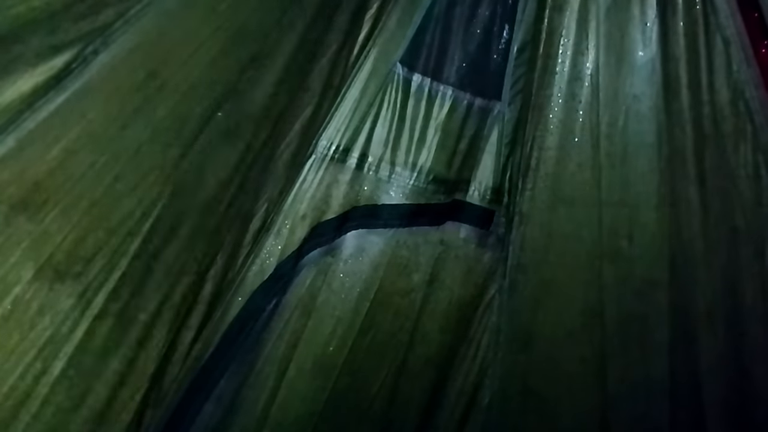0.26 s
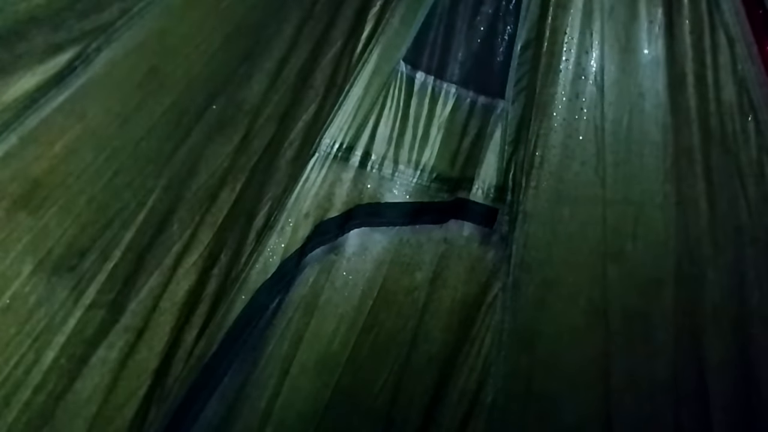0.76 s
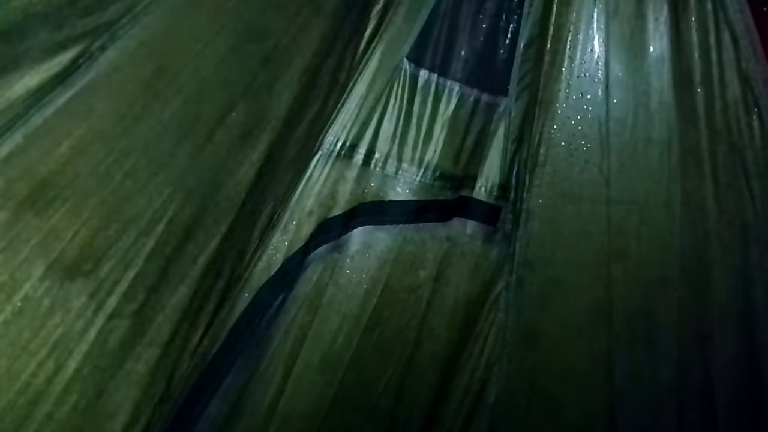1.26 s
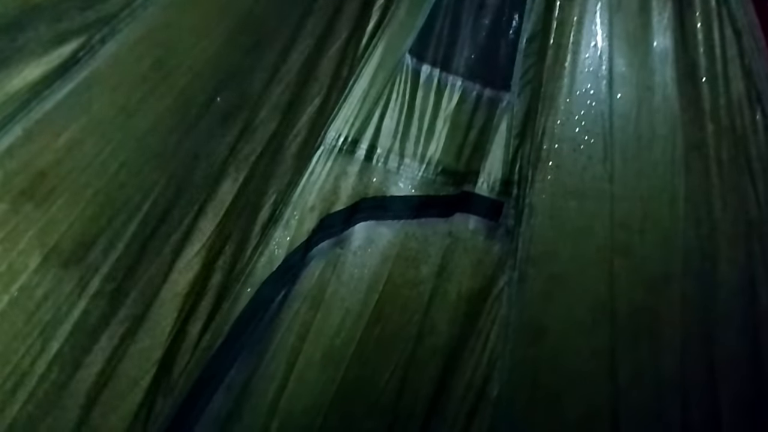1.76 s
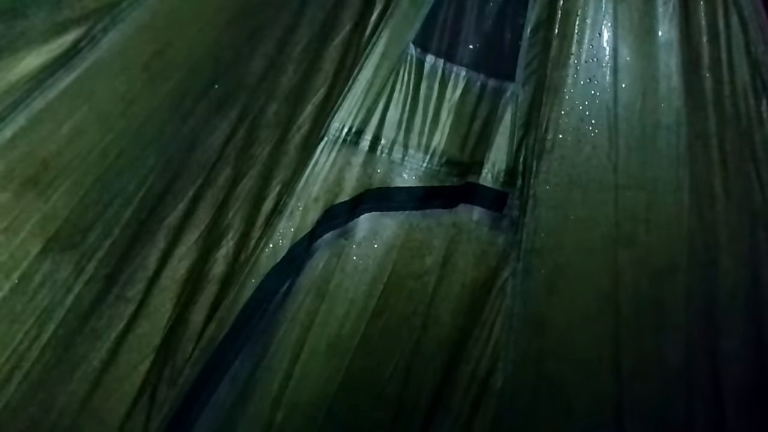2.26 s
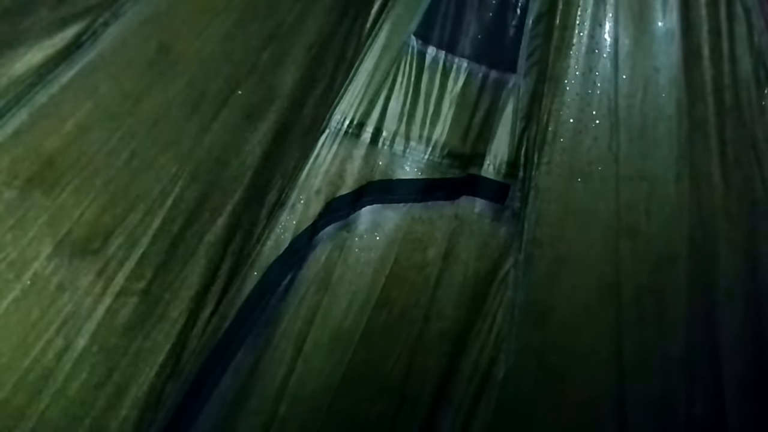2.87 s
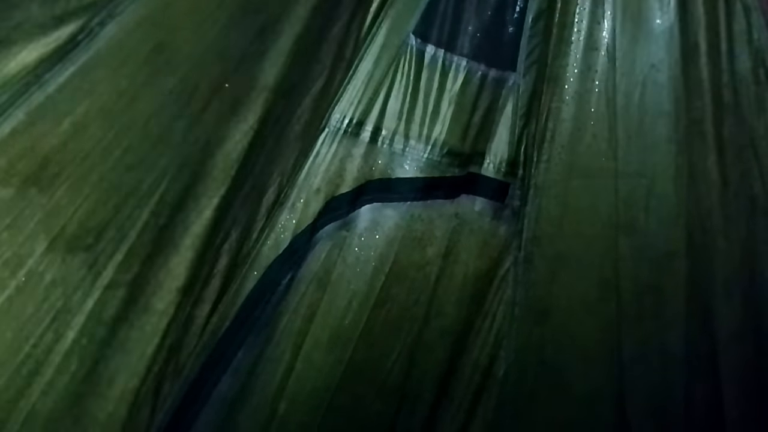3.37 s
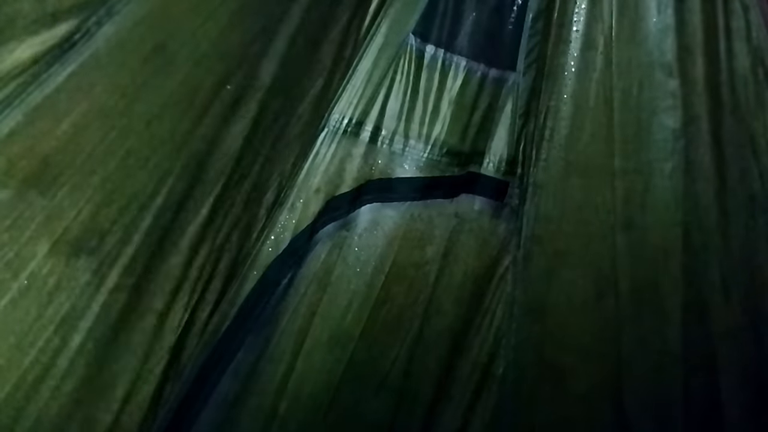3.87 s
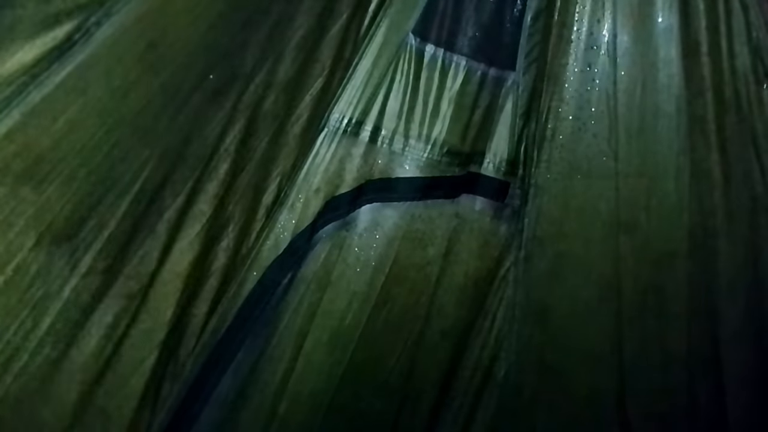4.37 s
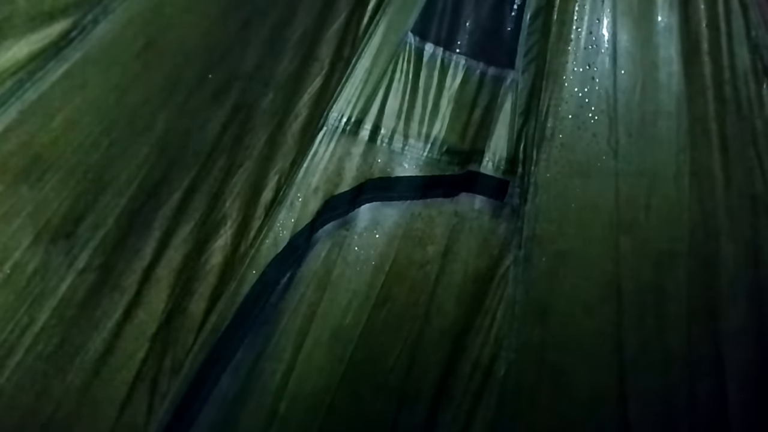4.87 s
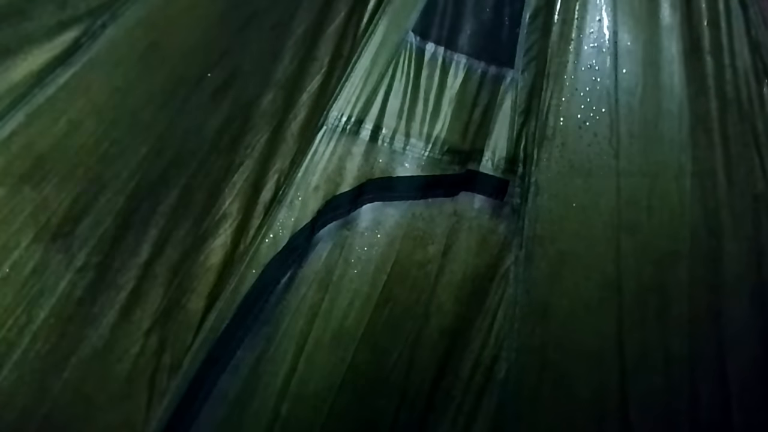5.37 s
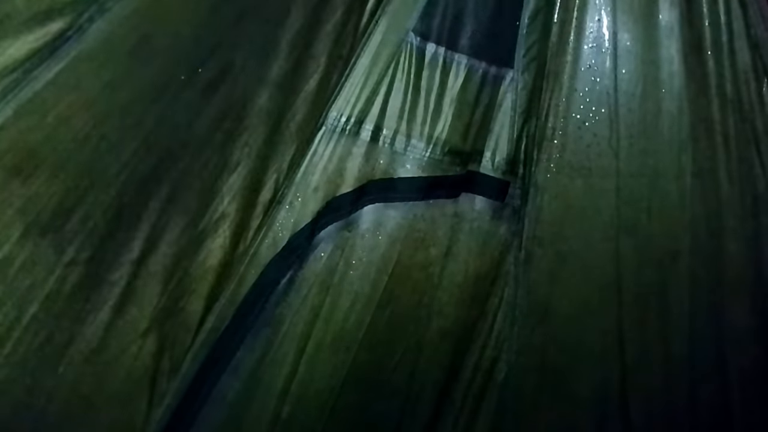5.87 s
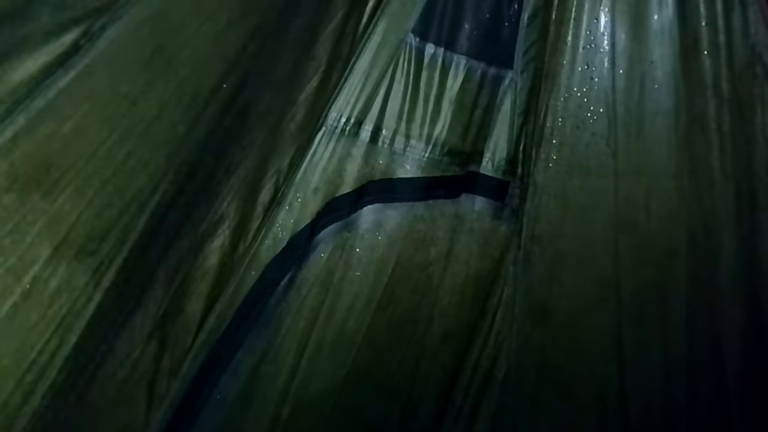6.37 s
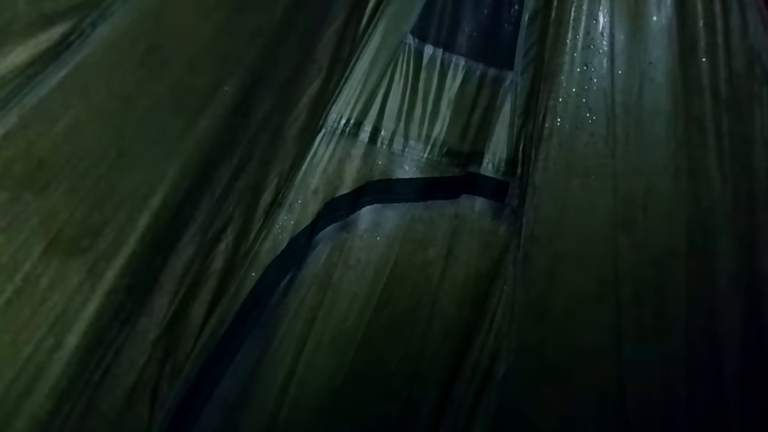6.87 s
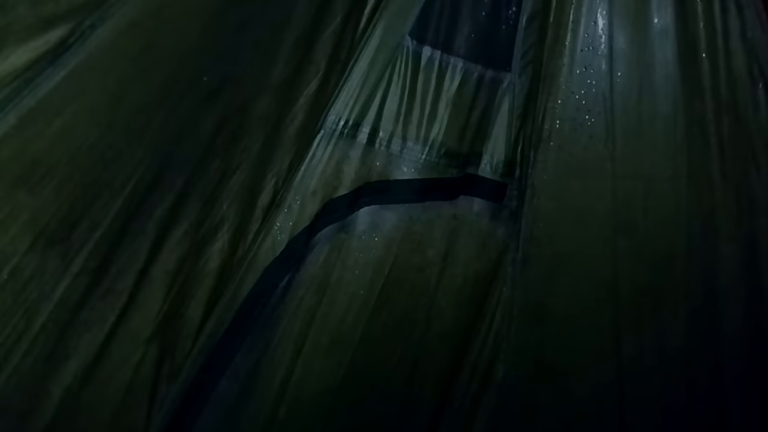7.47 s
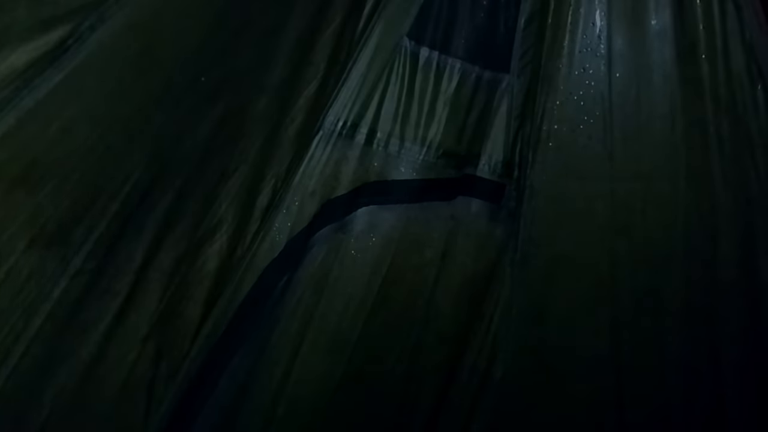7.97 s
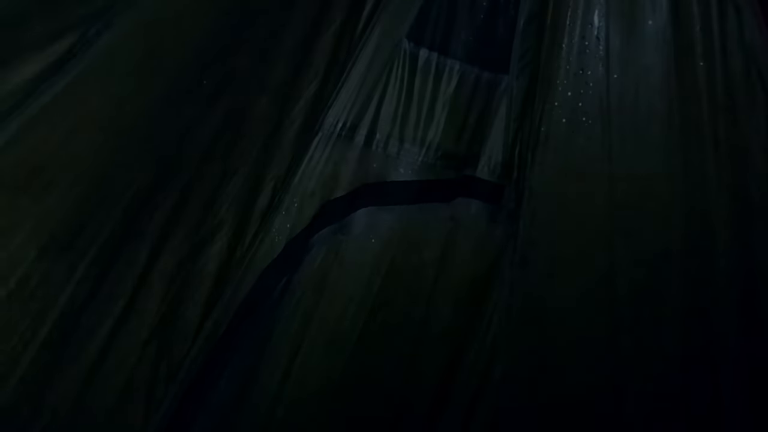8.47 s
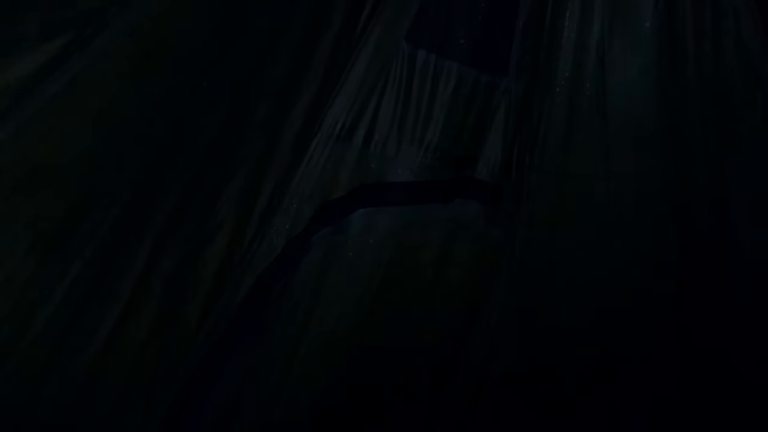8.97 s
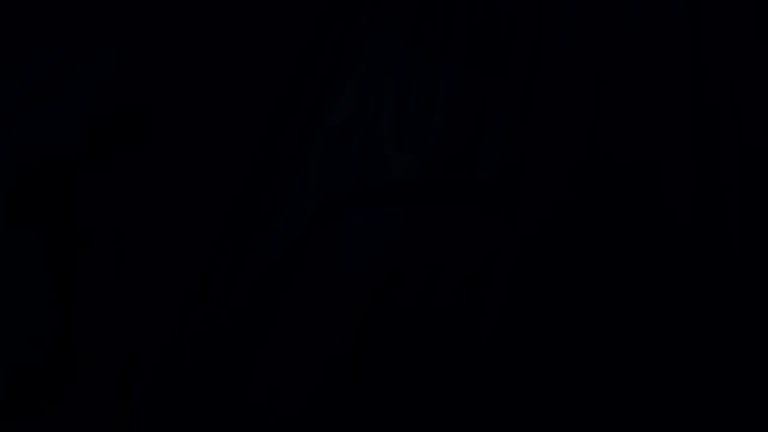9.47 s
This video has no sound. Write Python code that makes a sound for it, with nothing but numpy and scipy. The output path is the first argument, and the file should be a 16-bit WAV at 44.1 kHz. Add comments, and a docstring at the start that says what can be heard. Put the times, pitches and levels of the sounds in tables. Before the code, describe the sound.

Tent fabric crinkles, snaps and slides over itself in gusts, with fine spray ticking over a faint steady wind.

```python
"""Tent on a stormy, wet night

Wind rushes outside, gusts set a wall panel fluttering and fine spray ticks on the fabric.
The flysheet crinkles as its folds shift, drags, brushes and once slides over itself. In front, creases
flick over and the taut sheet snaps and rings. It is all on the left channel and fades out at the end."""
import sys
import numpy as np
from scipy import signal
from scipy.fft import rfft, irfft, next_fast_len
from scipy.io import wavfile
from scipy.ndimage import uniform_filter1d

SR = 44100
rng = np.random.default_rng(int(sys.argv[2]) if len(sys.argv) > 2 else 0)


def to_wav(s):
    """Save 16-bit WAV."""
    ch = np.atleast_2d(s).T  # columns
    pcm = np.round(np.clip(ch, -1, 1) * 32767)  # PCM
    wavfile.write(sys.argv[1], SR, pcm.astype(np.int16))


N = 429093
TIME = np.arange(N) / SR


def gain_of(db):
    """Decibels to amplitude."""
    return 10 ** (np.asarray(db) / 20)


def unit_rms(x):
    """Scales to rms 1."""
    return x / np.sqrt(np.mean(x ** 2) + 1e-20)


def automation(rows, column=1, **ends):
    """One column of a timed curve, at every sample."""
    rows = np.array(rows)
    return np.interp(TIME, rows[:, 0], rows[:, column], **ends)


def burst_power(time_s, level_db, rise_s, hold_s, fall_db_per_s):
    """The squared envelope of one movement: it builds until time_s, holds and dies away."""
    t = TIME - time_s
    rise = np.clip(1 + t / max(rise_s, 1 / SR), 0, 1)
    fall_db = fall_db_per_s * np.clip(t - hold_s, 0, None)
    return (rise * gain_of(level_db - fall_db)) ** 2


def add(mix, time_s, sound):
    """Drops a sound into the mix."""
    part = mix[max(round(time_s * SR), 0):][:len(sound)]
    part += sound[:len(part)]


def band_noise(centre_hz, width_hz, size=N):
    """Noise of rms 1 in one steep resonance."""
    padded = next_fast_len(size)
    hz = np.fft.rfftfreq(padded, 1 / SR)
    spectrum = rfft(rng.standard_normal(padded)) / (1 + ((hz - centre_hz) / width_hz) ** 2) ** 2
    return unit_rms(irfft(spectrum, padded)[:size])


def wander(rate_hz):
    """Smooth random modulation of rms 1."""
    return band_noise(0, rate_hz)


def grains(per_s, spread_db):
    """Random tiny clicks, most small and a few large."""
    strength = gain_of(spread_db * np.minimum(rng.exponential(1, N), 4))
    return unit_rms(strength * rng.choice([-1, 1], N) * (rng.random(N) < per_s / SR))


def equalise(x, curve, peak_hz=1000, peak_db=0, relative_width=.15, size=2048):
    """An EQ curve plus one resonant peak; minimum phase keeps the attacks sharp."""
    hz = abs(np.fft.fftfreq(size, 1 / SR))
    curve_hz, curve_db = np.transpose(curve)
    db = np.interp(np.log(hz + 1), np.log(curve_hz), curve_db)
    db += peak_db / (1 + ((hz / peak_hz - 1) / relative_width) ** 2)
    response = np.exp(np.conj(signal.hilbert(np.log(gain_of(db)))))
    taps = np.fft.ifft(response).real[:size // 2]
    return signal.oaconvolve(x, taps)[:len(x)]


def shifting_folds(x, depth_db):
    """Different folds speak in turn, so patches of the spectrum come and go."""
    spectrogram = signal.stft(x, nperseg=256)[2]
    patches = uniform_filter1d(rng.standard_normal(spectrogram.shape), size=5, axis=0)
    patches = unit_rms(uniform_filter1d(patches, size=36, axis=1))
    return signal.istft(spectrogram * gain_of(depth_db * patches), nperseg=256)[1][:N]


def echoes(t60_s, size):
    """Sparse dying reflections of energy 1."""
    taps = rng.standard_normal(size) * (rng.random(size) < .1)
    taps *= gain_of(-60 * np.arange(size) / SR / t60_s)
    return taps / np.linalg.norm(taps)


def wall_scatter(x, wet_db, t60_s, sway_hz=.85, paths=3):
    """Close walls scatter each click; the paths crossfade as the walls sway."""
    wet = np.zeros(N)
    for k in range(paths):
        sway = np.cos(np.pi * (2 * sway_hz * TIME + k / paths)) * np.sqrt(2 / paths)
        wet += signal.oaconvolve(x * sway, echoes(t60_s, size=3000))[:N]
    return x + gain_of(wet_db) * wet


def with_tail(sound, wet_db=-16, t60_s=.47):
    """A sound with the faint tail that it leaves in the tent."""
    out = gain_of(wet_db) * signal.fftconvolve(sound, echoes(t60_s, size=18000))
    add(out, 0, sound)
    return out


# Wind strength: (time [s], relative level [dB])
WIND_STRENGTH = [(0.0, -65), (2.33, -63), (4.11, -64), (6.81, -62.5), (7.26, -59), (8.2, -59)]
# Tone of the wind through the walls: (frequency [Hz], gain [dB])
WIND_EQ = [(30, -17.5), (110, -17.5), (160, -26), (220, -6), (310, 2), (520, -5), (900, -1), (1500, -1.5),
           (2300, -8), (3500, -16), (5500, -20), (16000, -25)]


def wind(trim_db=1.5, gust_db=.5):
    """The bed: a steady rush outside, with quick small gusts."""
    rush = unit_rms(equalise(rng.standard_normal(N), WIND_EQ))
    return rush * gain_of(automation(WIND_STRENGTH) + trim_db + gust_db * wander(rate_hz=24))


# Gusts that hit a wall panel: (time [s], level [dB], hold [s])
GUSTS = [(5.76, -62, 0.04), (8.375, -57.5, 0.37), (8.93, -59, .03)]
# The panel's resonances: (frequency [Hz], width [Hz], relative level [dB])
PANEL_MODES = [(111, 68, -22.5), (283, 67, -2.5), (366, 22, -8.5)]


def flutter(rise_s=.15, fall_db_per_s=100, idle_db=-72, wind_tracking=2.95):
    """Turbulence shakes a taut panel's low resonances: a little as the wind grows, hard in the gusts."""
    shake = sum(gain_of(db) * band_noise(hz, width) for hz, width, db in PANEL_MODES)
    wind_db = automation(WIND_STRENGTH)
    idle = gain_of(idle_db + wind_tracking * (wind_db - wind_db.max()))
    gust_power = sum(burst_power(s, db, rise_s, hold, fall_db_per_s) for s, db, hold in GUSTS)
    return unit_rms(shake) * np.sqrt(idle ** 2 + gust_power)


# Bouts of shifting folds: (time [s], relative level [dB], rise [s], hold [s], fall [dB/s])
FOLD_BOUTS = [(0, -65, .01, 0.5, 46), (0.784, -61, 0.18, .02, 25), (2.06, -62.5, .08, .02, 40),
              (2.674, -66, 0.43, 0.11, 10), (3.807, -70, 0.13, .02, 35), (5.42, -64, .04, 0.16, 47),
              (5.796, -54.5, 0.2, 0.086, 43), (6.318, -62.5, 0.045, 0.074, 34),
              (7.403, -53.5, 0.33, 0.1, 24.5), (8.388, -64, 0.046, .06, 31),
              (8.912, -50, 0.046, 0.027, 300), (8.999, -62, 0.058, 0.062, 38)]


def fold_motion(rest_db=-80):
    """The envelope that drives spray and crinkle: bouts of movement over a faint restlessness."""
    return np.sqrt(gain_of(rest_db) ** 2 + sum(burst_power(*bout) for bout in FOLD_BOUTS))


# Tone of one spray tick: (frequency [Hz], gain [dB])
SPRAY_EQ = [(800, -22), (2800, -10.5), (5000, -6.5), (8000, 3), (10000, 4.5), (12500, -1), (16000, -10.5)]


def spray(motion, level_db=-70.5, motion_reference_db=-68, motion_tracking=.59):
    """Fine spray ticks on the sheet, somewhat harder while the fabric moves."""
    drops = wall_scatter(grains(per_s=55, spread_db=4), wet_db=-2.5, t60_s=.018)
    ticks = unit_rms(shifting_folds(equalise(drops, SPRAY_EQ), depth_db=1.5))
    return ticks * gain_of(level_db) * (motion / gain_of(motion_reference_db)) ** motion_tracking


# Crisp tone of the creases: (frequency [Hz], gain [dB])
CRINKLE_EQ = [(600, -37.5), (2800, -6.5), (4800, -11), (6500, -7.5), (8000, -1), (9700, 5), (11500, -4.5),
              (13000, -12.5), (16000, -16)]


def crinkle(motion, trim_db=-1, clump_db=1):
    """Folds shift and settle in a dense, clumpy fizz of creases."""
    clicks = grains(per_s=6000, spread_db=2.5) * gain_of(clump_db * wander(rate_hz=50))
    fizz = unit_rms(shifting_folds(equalise(clicks, CRINKLE_EQ), depth_db=2))
    return fizz * motion * gain_of(trim_db)


# Drags that follow the big snaps: (time [s], level [dB], hold [s])
DRAGS = [(5.605, -60.5, .18), (8.353, -52.5, .005), (8.907, -51, 0.12)]
# Dull tone of dragging cloth: (frequency [Hz], gain [dB])
DRAG_EQ = [(200, -37), (330, 7), (550, -20.5), (950, 4.5), (1300, -3.5), (1750, -1), (2300, -17.5),
           (4500, -39.5), (12000, -21.5)]


def drag(rise_s=.012, fall_db_per_s=110):
    """Slack cloth drags with a dull, grainy friction."""
    slips = wall_scatter(grains(per_s=2000, spread_db=5.5), wet_db=-2.5, t60_s=.07)
    power = sum(burst_power(s, db, rise_s, hold, fall_db_per_s) for s, db, hold in DRAGS)
    return unit_rms(equalise(slips, DRAG_EQ)) * np.sqrt(power)


# Quick jerks of a fold brushing past: (time [s], level [dB])
BRUSH_JERKS = [(8.395, -55.5), (8.436, -46), (8.487, -52), (8.525, -53.5), (8.912, -48), (8.935, -47.5)]
# Airy tone of the swish: (frequency [Hz], gain [dB])
BRUSH_EQ = [(5000, -44), (7300, -16), (7800, -1), (8700, -5), (9600, 2), (11000, 0), (11900, -3),
            (13000, -21)]


def brush(rise_s=.019, hold_s=.002, fall_db_per_s=380):
    """Tiny slips of the weave give a high, dry swish."""
    slips = wall_scatter(grains(per_s=1400, spread_db=4.5), wet_db=3, t60_s=.022)
    power = sum(burst_power(s, db, rise_s, hold_s, fall_db_per_s) for s, db in BRUSH_JERKS)
    return unit_rms(equalise(slips, BRUSH_EQ)) * np.sqrt(power)


# The sheet sliding over itself: (time [s], level [dB], grip [0-1])
SLIDE_MOVE = [(7.09, -65, 1), (7.125, -42.5, 1), (7.22, -40, 1), (7.33, -41.5, .99), (7.38, -47, .25),
              (7.47, -49.5, 0.073), (7.5, -43.5, .05), (7.57, -60, .05), (7.8, -63, 0.042)]
# Wide rasp at full grip: (frequency [Hz], gain [dB])
RASP_EQ = [(600, -60), (3000, -17.5), (3900, -22), (4400, -15), (5050, -15), (5900, -3.5), (7100, -2),
           (9100, 0), (10700, 0), (11700, -34), (12500, -1.5), (13700, -17), (14400, -9), (16000, -21)]
# Thin whistling hiss at light grip: (frequency [Hz], gain [dB])
HISS_EQ = [(1500, -62), (5000, -40), (7500, -9), (8500, -2), (9100, 6), (9600, 1), (10200, -10),
           (13000, -35)]


def slide(jerk_db=3.5):
    """The weave sticks and slips; as the grip eases, the rasp narrows to a thin hiss."""
    slips = grains(per_s=3000, spread_db=1.5) * gain_of(jerk_db * wander(rate_hz=110))
    slips = wall_scatter(slips, wet_db=-5.5, t60_s=.029)
    grip = automation(SLIDE_MOVE, column=2)
    rasp = np.sqrt(grip) * unit_rms(equalise(slips, RASP_EQ))
    hiss = np.sqrt(1 - grip) * unit_rms(equalise(slips, HISS_EQ))
    return (rasp + hiss) * gain_of(automation(SLIDE_MOVE, left=-np.inf, right=-np.inf))


# Ring-outs of the fabric: (time [s], level [dB], frequency [Hz], width [Hz], 60 dB decay [s])
RING_OUTS = [(.727, -61, 3680, 350, 0.12), (.915, -62, 1250, 350, 0.035), (2.029, -70, 2930, 70, 0.96),
             (2.545, -62.5, 5640, 1100, 1), (5.601, -34, 890, 200, 0.037), (5.601, -71, 3300, 170, 2.7),
             (5.768, -65, 2396, 120, 0.77), (5.768, -59, 857, 109.3, 0.92), (6.305, -76, 3250, 160, 1.2),
             (8.878, -37, 916, 110, 0.095)]


def rings(size=40000):
    """Taut fabric rings after a blow, in fuzzy resonances that die away."""
    t, out = np.arange(size) / SR, np.zeros(N)
    for time_s, db, hz, width_hz, t60_s in RING_OUTS:
        add(out, time_s, band_noise(hz, width_hz, size) * gain_of(db - 60 * t / t60_s))
    return out


# Low push under the hardest snap: (time [s], level [dB], frequency [Hz])
AIR_PUFF = (5.770, -51.5, 130)


def puff(width_s=.0039):
    """The wall shoves the air: one low swing of pressure."""
    time_s, db, hz = AIR_PUFF
    t = TIME - time_s
    window = np.exp(-np.minimum((t / width_s) ** 2, 50))
    return gain_of(db) * np.sin(2 * np.pi * hz * t) * window


# The four layers of a snap, low to high, each: (frequency [Hz], gain [dB])
THUMP_EQ = [(30, -49), (110, -14), (160, -21), (270, 3.5), (380, -2.5), (700, -13.5), (2000, -52.5)]
BODY_EQ = [(70, -49), (200, -32.5), (550, -6), (900, 4), (1600, 5), (2400, 4.5), (4500, -17), (12000, -37)]
CRACK_EQ = [(900, -35), (2300, -1), (3200, -1), (4000, -4.5), (5800, -4), (8000, -23), (16000, -30.5)]
SIZZLE_EQ = [(2500, -39), (5300, -25), (7000, 0), (8500, 4), (10500, 1), (11700, -4), (12400, -6.5),
             (16000, -21.5)]


def snap(thump_db, body_db, crack_db, sizzle_db, bright_db, sharpness, body_hz, crack_hz,
         pulse_s=.00096, scatter_s=.0065, tail_s=.018, tail_db=-14, attack_s=.012, size=5000):
    """A sharp pulse, a scatter through nearby folds and a short tail; each fold has its own resonances."""
    t = np.arange(size) / SR
    pulse, folds, walls = rng.standard_normal((3, size))
    tail = gain_of(tail_db) * walls * np.exp(-t / tail_s)
    scatter = np.sqrt(1 - sharpness) * unit_rms(folds * np.exp(-t / scatter_s) + tail)
    # the sheet moves as one in the lows, but lets go thread by thread in the treble
    knock = np.sqrt(sharpness) * unit_rms(1.0 * (t == 0)) + scatter
    threads = np.sqrt(sharpness) * unit_rms(pulse * np.exp(-t / pulse_s)) + scatter
    sizzle_eq = [(hz, db + bright_db * (hz > 12000)) for hz, db in SIZZLE_EQ]
    sizzle_hz = rng.uniform(8000, 10200)
    layers = [(thump_db, equalise(knock, THUMP_EQ)),
              (body_db, equalise(knock, BODY_EQ, body_hz, peak_db=8, relative_width=.28)),
              (crack_db, equalise(threads, CRACK_EQ, crack_hz, peak_db=8, relative_width=.089)),
              (sizzle_db, equalise(threads, sizzle_eq, sizzle_hz, peak_db=3, relative_width=.12))]
    # each level sets its layer's rms over the attack
    return sum(gain_of(db) * layer / np.sqrt(np.mean(layer[t < attack_s] ** 2)) for db, layer in layers)


# Single creases flicking over: (time [s], sizzle level [dB], brightness above 12 kHz [dB])
CREASE_FLICKS = [(0.108, -57.5, 1), (0.17, -59, 10), (0.245, -52.5, -13), (0.327, -62.5, 5),
                 (0.4376, -57.5, 2), (0.679, -61, 6), (0.7448, -55, 8), (0.874, -53.5, 9), (1.2483, -58, 4),
                 (1.571, -56.5, -4), (1.723, -59, -1), (1.786, -56.5, 1), (1.9, -61, 2), (1.974, -57, 9),
                 (2.012, -57, 2), (2.192, -56.5, -3), (2.2307, -58.5, 7), (2.2468, -56, -3),
                 (2.3015, -56, 8.5), (2.4157, -57.5, 5), (2.4917, -46.5, -6), (2.503, -54.5, 6),
                 (2.537, -55, 2), (2.544, -49, -3), (2.7263, -58, 5), (2.8767, -59, 14), (3.027, -60, 2),
                 (3.6034, -61.5, 1), (3.7633, -60, 3), (4.472, -57, -2), (5.2, -63.5, -10),
                 (5.3946, -50, -2), (5.4493, -50, -3), (5.7081, -47, -12), (5.7317, -45, -20),
                 (5.8745, -48, 0), (5.885, -52, -2), (5.9736, -50, 0), (6.079, -49, -5), (6.3563, -49, -2),
                 (6.8645, -51, -5), (7.0676, -56, 3), (7.1176, -39.5, -10), (7.15, -39, -13),
                 (7.222, -44, -17), (7.4011, -37.5, -11), (7.438, -46, -11), (7.4854, -47.5, 0),
                 (7.7235, -53, 5), (9.0841, -53, -6), (9.22, -58, 4.5)]


def flicks(thump_db=-28, body_db=-14, crack_db=-10, widening=.81):
    """Creases flip in light snaps, nearly all sizzle; a brighter one also has fuller lows."""
    out = np.zeros(N)
    for time_s, sizzle_db, bright_db in CREASE_FLICKS:
        low_db = sizzle_db + widening * bright_db
        flick = snap(low_db + thump_db, low_db + body_db, low_db + crack_db, sizzle_db, bright_db,
                     sharpness=.33, body_hz=1300, crack_hz=rng.uniform(3800, 6000))
        add(out, time_s, with_tail(flick))
    return out


# The main hits: (time [s], thump [dB], body [dB], crack [dB], sizzle [dB], brightness above 12 kHz [dB],
# sharp pulse share [0-1], body resonance [Hz], crack resonance [Hz])
SHEET_SNAPS = [(0.0317, -59, -61, -63.5, -67.5, -5, 0.4, 1320, 2540),
               (0.728, -85, -54, -54.5, -57.5, 6, .7, 1480, 3720),
               (.915, -83, -45.5, -52.5, -44.5, -1, 0.4, 1320, 2900),
               (1.958, -86, -53.5, -58, -61, 8, 0.34, 1360, 2510),
               (2.029, -57.5, -51, -49, -43, 2, 0.3, 1660, 5900),
               (2.6065, -81, -48, -53, -49, 6, 0.5, 1550, 5650),
               (3.4494, -79, -64, -55, -53, 9, 0.3, 1660, 3560),
               (5.3797, -80, -49, -48, -48, 1, 0.45, 1820, 5940),
               (5.6003, -60.5, -38, -41, -34, -9, 0.03, 860, 3020),
               (5.7674, -51.5, -42.5, -37.5, -24, -3.5, 0.2, 1630, 3460),
               (6.1464, -83, -53, -58.5, -42.5, -10, 0.6, 1280, 4970),
               (6.3053, -63, -45.5, -57, -51.5, 1, 0.55, 1280, 2510),
               (6.3214, -70, -52, -62, -49.5, -4, 0.2, 1310, 2770),
               (6.6329, -62, -53, -56.5, -48.5, 2, 0.27, 835, 5220),
               (7.0774, -59, -58, -62, -49, 12, .15, 1800, 5900),
               (7.6532, -62, -48.5, -50, -49.5, 6, 0.08, 770, 2750),
               (8.338, -51.5, -43.5, -46.5, -38, 6, 0.3, 1300, 5700),
               (8.7423, -47, -51.5, -49, -45, -4, 0.34, 860, 4600),
               (8.8779, -45.5, -32, -38.5, -38, 8, 0.1, 1200, 2490)]


def sheet_snaps():
    """The taut flysheet snaps as a whole, from a low thump up to a sizzle."""
    out = np.zeros(N)
    for time_s, *settings in SHEET_SNAPS:
        add(out, time_s, with_tail(snap(*settings)))
    return out


def scene():
    """Wind bed, hits and friction on the left channel; the right is silent."""
    motion = fold_motion()
    hits = sheet_snaps() + flicks() + puff() + rings() + spray(motion)
    friction = crinkle(motion) + slide() + brush() + drag()
    return np.array([wind() + flutter() + hits + friction, np.zeros(N)])


def record(dry, gain_db=6, fade_end_s=9.799, fade_s=.96, fade_curve=1.23, cutoff_hz=15950):
    """Master gain, a closing fade and a steep low-pass."""
    fade = np.clip((fade_end_s - TIME) / fade_s, 0, 1) ** fade_curve
    low_pass = signal.firwin(511, cutoff_hz, window=("kaiser", 9), fs=SR)
    return signal.oaconvolve(dry * fade * gain_of(gain_db), low_pass[None], "same", axes=1)


dry = scene()
out = record(dry)
to_wav(out)
```